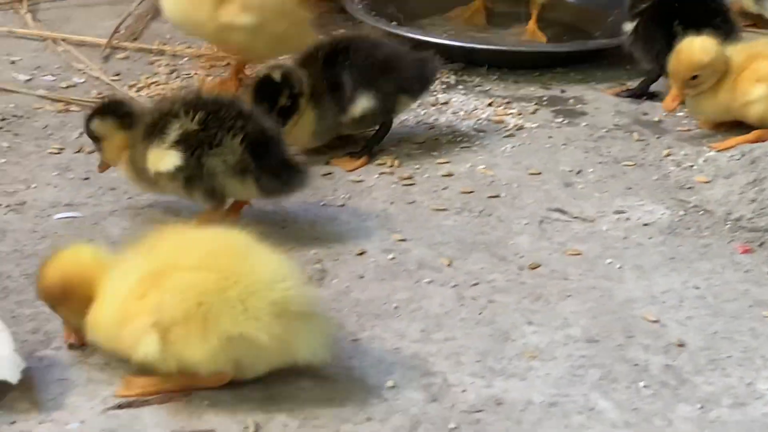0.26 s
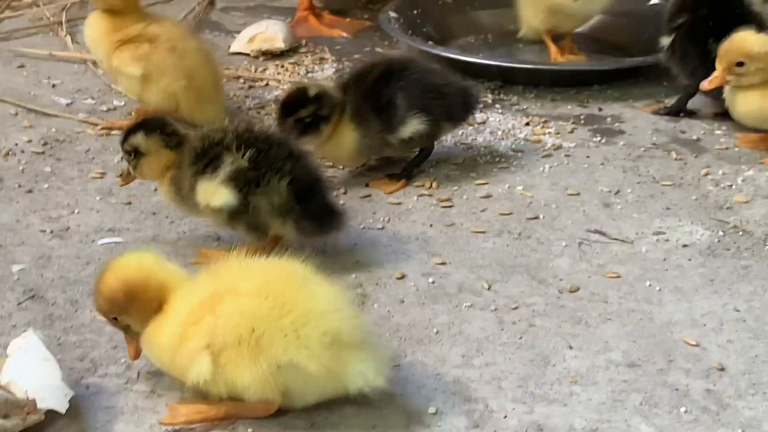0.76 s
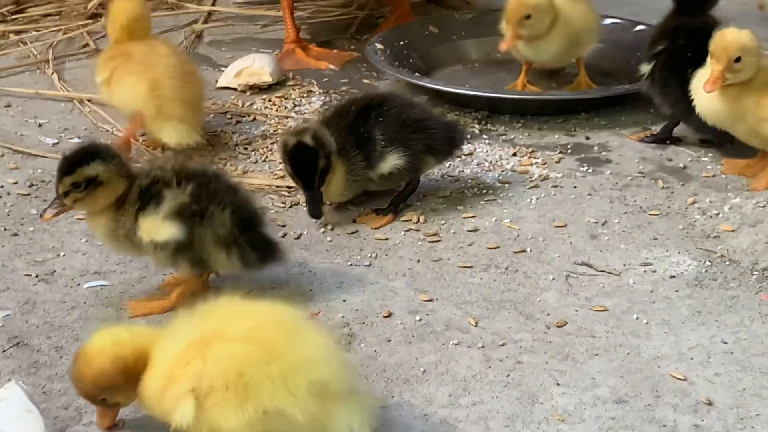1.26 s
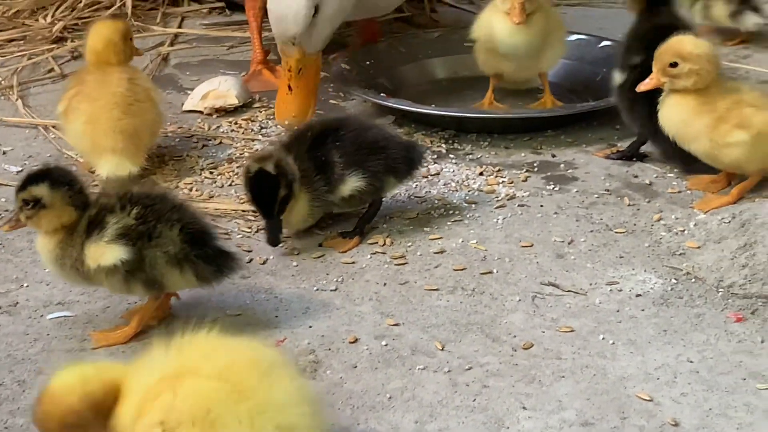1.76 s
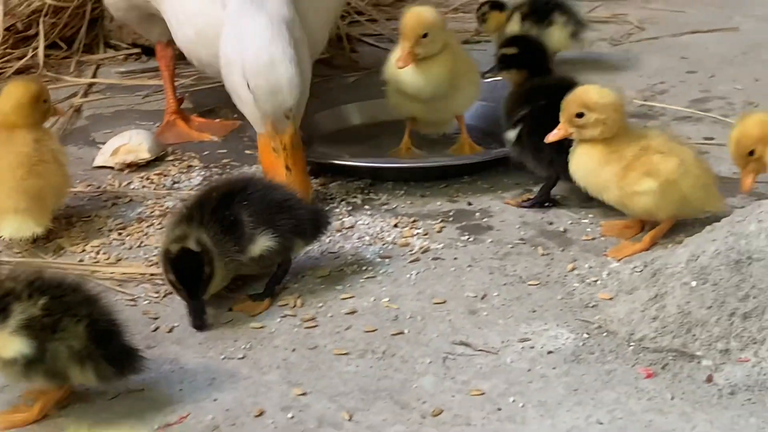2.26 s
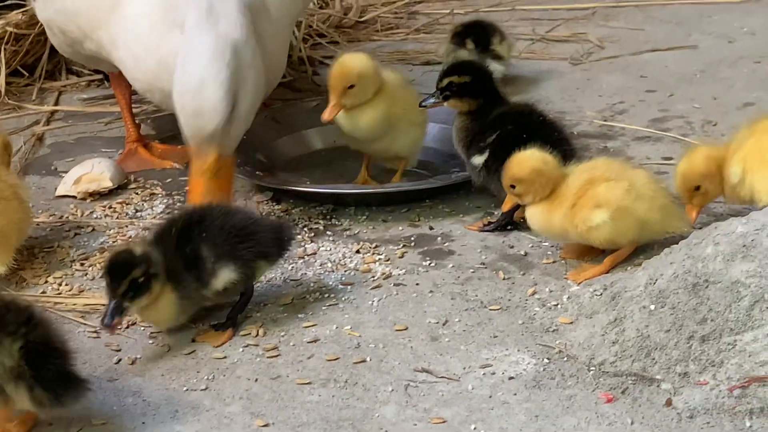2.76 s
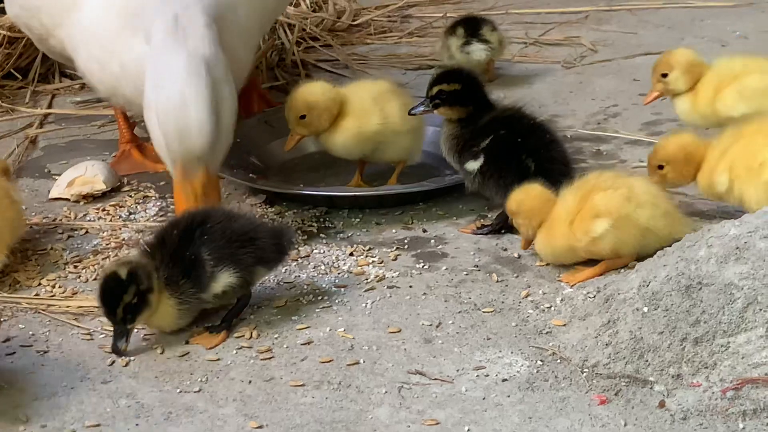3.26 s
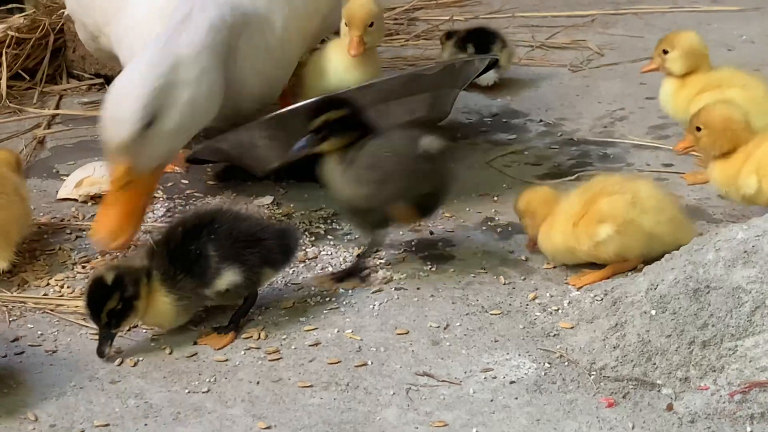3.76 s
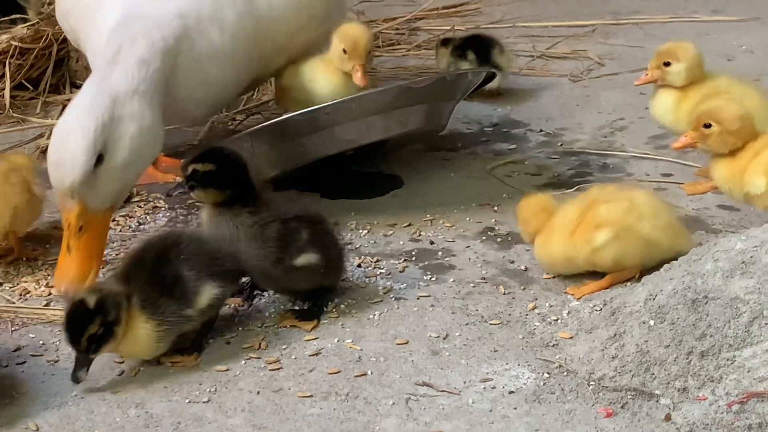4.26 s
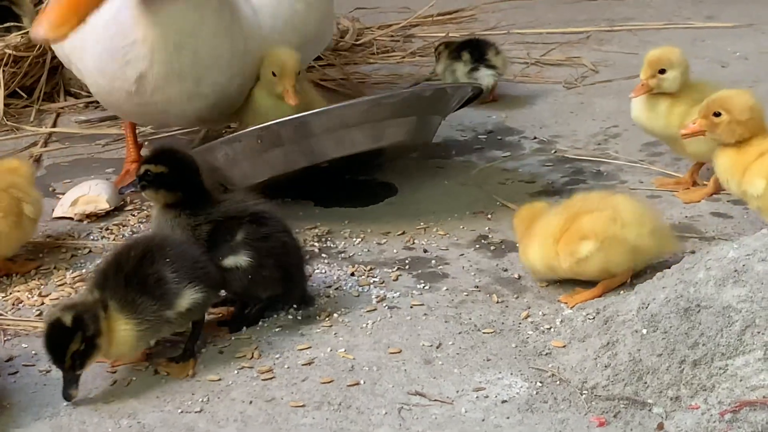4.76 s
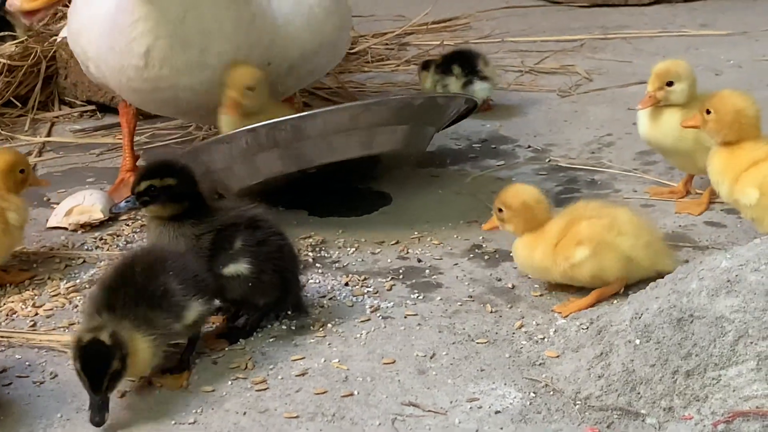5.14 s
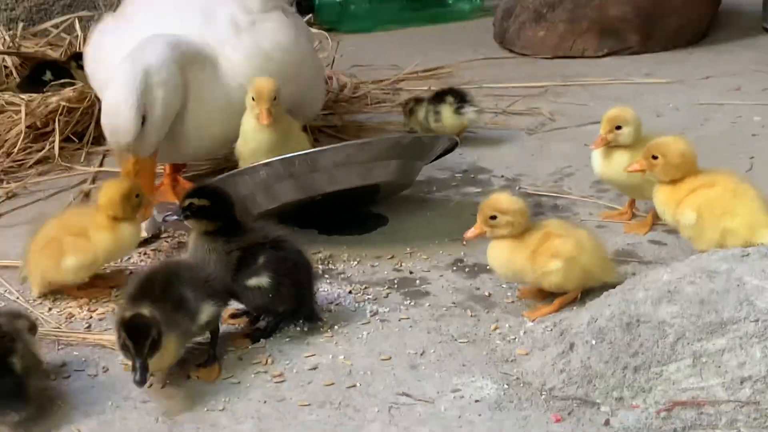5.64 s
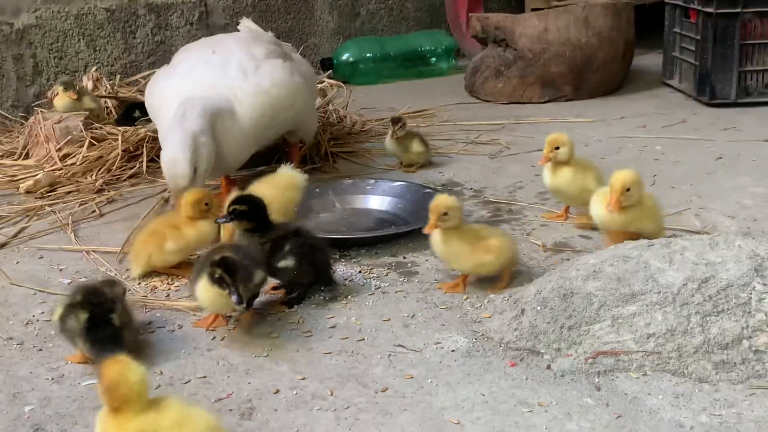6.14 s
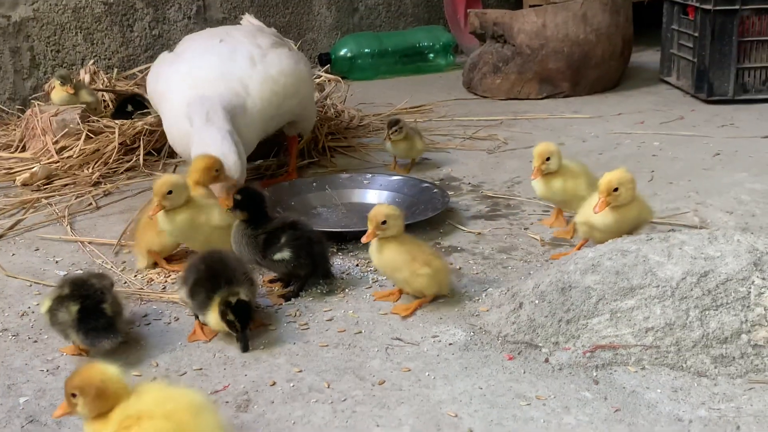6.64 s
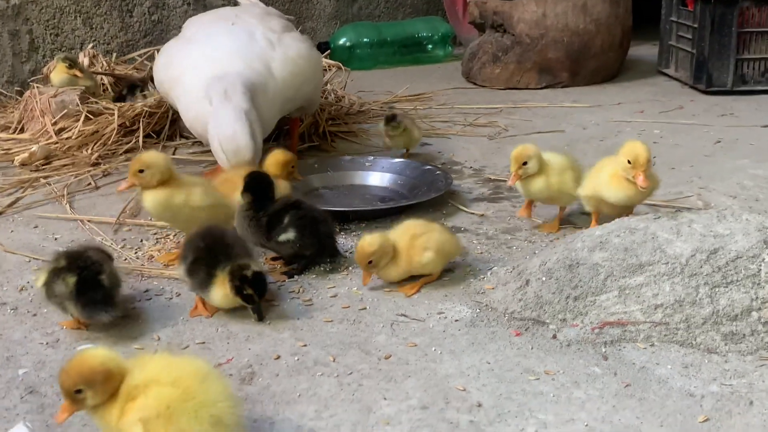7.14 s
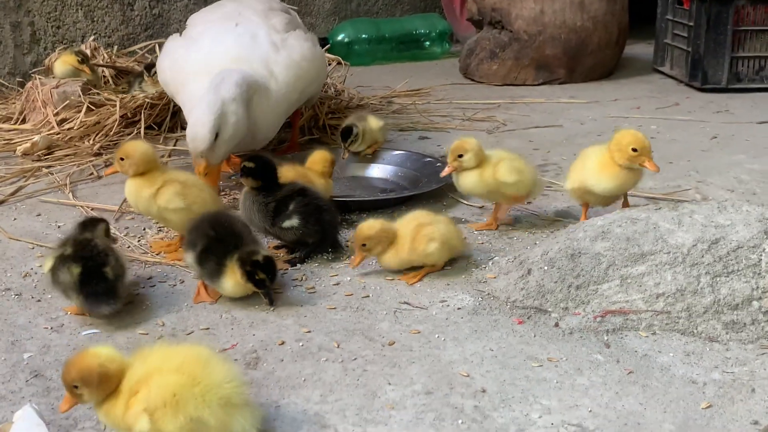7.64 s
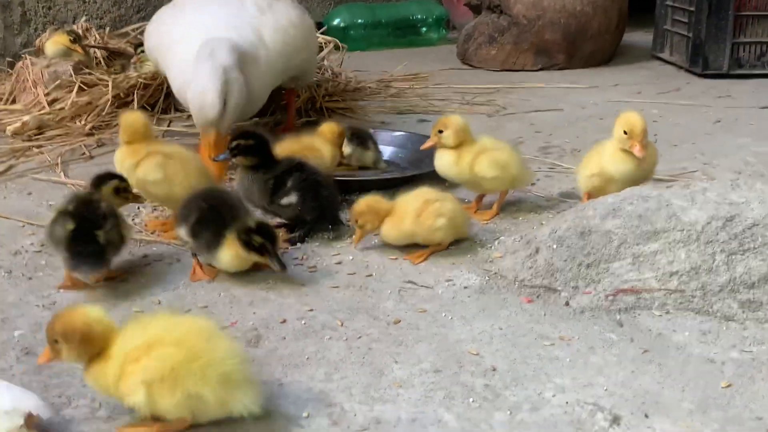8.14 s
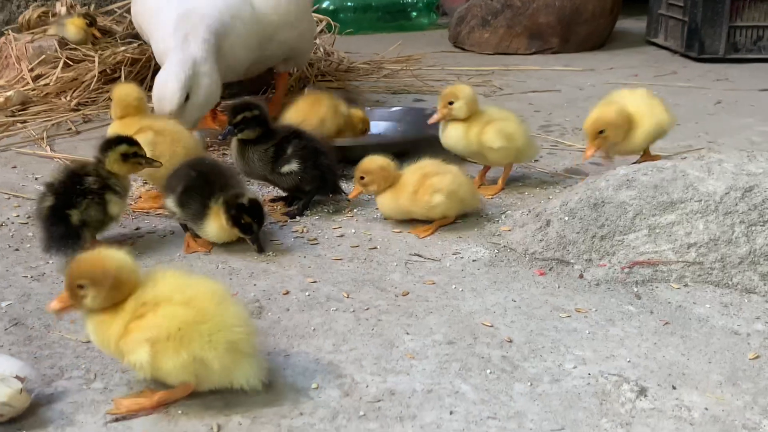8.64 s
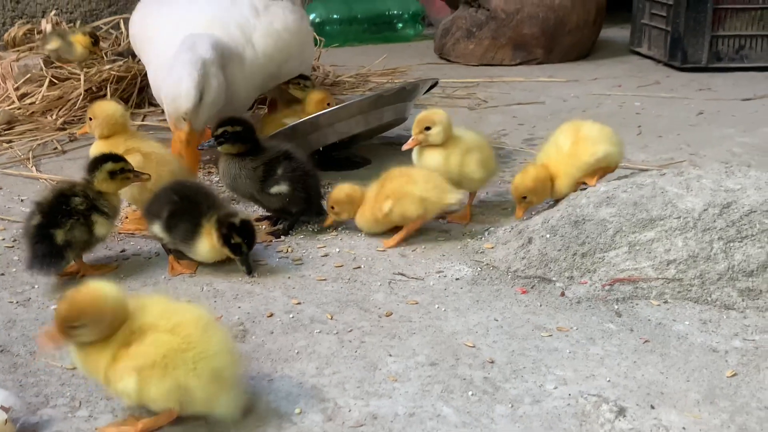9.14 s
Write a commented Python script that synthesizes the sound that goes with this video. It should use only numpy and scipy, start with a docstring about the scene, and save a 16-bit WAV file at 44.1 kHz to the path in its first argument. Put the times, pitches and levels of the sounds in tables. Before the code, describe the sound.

A brood of ducklings peeps continuously, close and outdoors on concrete beside a wall. A thin steel dish clatters at the very start, then an adult duck gives two short rough quacks in the first second. Lighter tinny knocks and scrapes return in the middle, a hard metallic bang comes just before six seconds, and weaker taps follow near the end. Straw and grain rustle softly over low distant traffic.

```python
"""Ducklings peep throughout around a duck on a concrete yard floor, with far traffic and close walls behind.
A thin steel dish clatters at the start as damped modes; the duck, left of two spaced microphone ports,
quacks at 0.5 and 1 s, as pitch pulses through throat resonances, and grunts at 3.6 s amid new clatter.
The hardest blows fall at 5.9 s, weaker ones after 7.8 s; filtered noise makes feet and bills shuffle
in straw and grain."""
import sys
import numpy as np
from scipy import signal
from scipy.fft import rfft, irfft, next_fast_len
from scipy.io import wavfile
from scipy.ndimage import uniform_filter1d, map_coordinates

SR = 44100
rng = np.random.default_rng(int(sys.argv[2]) if len(sys.argv) > 2 else 0)


def wav_out(sig):
    """Save sig, one row per channel (or a flat mono array), as 16-bit PCM at SR to the path in sys.argv[1]."""
    wavfile.write(sys.argv[1], SR, np.round(np.clip(np.atleast_2d(sig).T, -1, 1) * 32767).astype(np.int16))


N = 414540


def amp(db):
    """Decibels are logarithmic: 20 dB is a tenfold amplitude."""
    return 10 ** (np.asarray(db) / 20)


def unit(x):
    """Normalization: x scaled to an rms of 1."""
    return x / np.sqrt(np.mean(x ** 2) + 1e-20)


def along(points, hz):
    """Interpolates (Hz, value) points on a logarithmic frequency axis, as pitch is heard."""
    f, v = np.transpose(points)
    return np.interp(np.log(hz + 1), np.log(f + 1), v)


def curves(rows):
    """Piecewise linear envelopes: one value per sample for each column after the time."""
    s, *cols = np.transpose(rows)
    return [np.interp(np.arange(N) / SR, s, c, left=c[0], right=c[-1]) for c in cols]


def wobble(rate):
    """Slow random modulation: a smooth curve through `rate` random knots a second."""
    knots = rng.standard_normal(int(N * rate / SR) + 4)
    return map_coordinates(knots, [np.arange(N) * rate / SR])


def filtered(x, response):
    """Linear filtering: the spectrum of x times a complex response of frequency."""
    m = next_fast_len(N + SR // 4)
    return irfft(rfft(x, m) * response(np.fft.rfftfreq(m, 1 / SR)), m)[..., :N]


def ports(x, lead_s):
    """Interaural-style delay: the left port hears x lead_s earlier than the right one."""
    side = np.array([[1], [-1]])
    return filtered(x, lambda hz: np.exp(1j * np.pi * hz * lead_s * side))


def rush(mid, side, side_db, grains):
    """Stereo noise as a sum of alike and opposed parts, uneven in patches; grains sets the crackle."""
    crackle = rng.exponential(1, N // 64 + 1).repeat(64)[:N]
    source = rng.standard_normal((2, N)) * amp(grains * crackle)
    z = signal.stft(source, nperseg=512)[2]
    patches = uniform_filter1d(rng.standard_normal(z.shape[1:]), size=6, axis=0)
    patches = uniform_filter1d(patches, size=12, axis=1)
    source = signal.istft(z * amp(3 * unit(patches)), nperseg=512)[1][:, :N]
    m, s = filtered(source, lambda hz: amp([along(mid, hz), along(side, hz)]))
    m, s = unit(m), amp(side_db) * unit(s)
    return np.array([m + s, m - s])


def add(track, s, sound):
    """Superposition: mixes sound into track from s seconds."""
    part = track[..., max(round(s * SR), 0):][..., :sound.shape[-1]]
    part += sound[..., :part.shape[-1]]


def peep(length, start_hz, top_hz, end_hz, turn, hoarse):
    """Frequency modulation: a hoarse whistle follows a two-sided pitch arch, with a weak octave."""
    u = np.arange(round(length * SR)) / (length * SR)
    turn = np.clip(turn, .05, .95)
    rise = top_hz - (top_hz - start_hz) * (1 - u / turn) ** 2
    fall = top_hz - (top_hz - end_hz) * ((u - turn) / (1 - turn)) ** 2
    hz = np.where(u < turn, rise, fall)
    rasp = unit(uniform_filter1d(rng.standard_normal((2, len(u))), size=70))  # phase and level flutter
    phase = 2 * np.pi * np.cumsum(hz) / SR + hoarse * rasp[0]
    envelope = np.sin(np.pi * u) ** 0.49 * (1 + hoarse * rasp[1])
    return envelope * (np.sin(phase) + amp(-25.0) * np.sin(2 * phase))


def ducklings():
    """Direct and reverberant sound: near peeps one by one, and a random far chatter for the walls alone."""
    # near peeps: start_s, length_s, top_hz, arch_depth (share of the top), level_db (before spread and mix)
    near_peeps = [(0, .045, 3950, .02, -46), (.25, .055, 2900, .18, -48), (0.409, 0.054, 3500, 0.32, -41),
                  (0.698, .061, 3440, .07, -48.5), (.827, .065, 3880, .31, -46),
                  (0.873, .069, 4030, .3, -49), (1.203, .026, 3455, .3, -50.5),
                  (1.299, .05, 2910, .3, -51.5), (1.368, .052, 3110, .29, -56),
                  (1.456, .056, 3610, .3, -46), (1.533, .04, 3800, .2, -49.5), (1.612, .06, 3350, .28, -51),
                  (1.728, .055, 3620, .3, -48), (1.79, .049, 3780, .28, -45), (2.056, .066, 5640, .4, -48),
                  (2.154, .065, 4710, .45, -49.5), (2.379, .07, 3896, .27, -49),
                  (2.552, .045, 3780, .1, -50), (2.63, .075, 2200, .03, -51), (2.74, .05, 3260, .08, -52.5),
                  (2.787, .077, 3770, .29, -42), (2.833, .076, 2938, .13, -48), (2.83, .08, 4200, .23, -50),
                  (3.0, .05, 3120, .06, -51), (3.04, .065, 3950, .07, -49), (3.1, .06, 2150, .03, -54),
                  (3.198, .066, 3176, .08, -42.5), (3.26, .11, 3300, .05, -45.5),
                  (3.456, .034, 4020, .05, -44.5), (3.746, .05, 2850, .28, -45),
                  (3.79, .11, 2724, .31, -49), (4.004, .05, 3856, .04, -47.5),
                  (4.11, .049, 4570, .4, -39.5), (4.128, .042, 5380, .45, -44),
                  (4.161, .075, 3340, .26, -42), (4.265, .046, 3620, .36, -46),
                  (4.291, .048, 3370, .28, -43), (4.42, .067, 4027, .09, -50.5),
                  (4.429, 0.037, 4750, .04, -52), (4.734, .062, 4010, .22, -46),
                  (4.745, .043, 4610, .2, -51.5), (4.759, .057, 3470, .3, -45.5),
                  (4.845, .057, 4260, .36, -43.5), (4.873, .051, 3690, .05, -46),
                  (4.984, .053, 5310, .5, -44), (5.335, .06, 3400, .1, -50.5),
                  (5.461, .089, 3435, .25, -43), (5.472, .058, 3975, .32, -46.5),
                  (6.15, .05, 3550, .3, -49), (6.168, .045, 3900, .06, -45),
                  (6.285, 0.077, 3970, .3, -47.5), (6.296, 0.026, 4500, .05, -51.5),
                  (6.472, .071, 4190, .44, -50), (6.492, .056, 3650, .29, -43),
                  (6.645, .064, 3925, .28, -38), (6.682, .047, 3330, .32, -51.5),
                  (6.811, .079, 3920, .3, -42.5), (6.958, .052, 4620, .28, -43.5),
                  (7.026, .041, 3850, .28, -42.5), (7.15, .058, 4350, .42, -43),
                  (7.257, .081, 3140, .19, -47), (7.303, .062, 4500, .29, -43), (7.27, .12, 2200, .03, -57),
                  (7.352, .05, 3150, .2, -49), (7.388, .045, 3660, .2, -47.5), (7.432, .06, 3300, .22, -47),
                  (7.49, .03, 3250, .15, -51), (7.698, .066, 4424, .35, -45.5),
                  (7.786, .043, 3260, .15, -52), (7.872, .06, 5650, .4, -53.5), (8.003, .06, 3850, .1, -53),
                  (8.259, .053, 4045, .39, -43), (8.375, .054, 3290, .41, -48),
                  (8.398, .068, 4640, .29, -47), (8.54, .048, 3026, .27, -47.5),
                  (8.596, .061, 4216, .38, -43.5), (8.634, .051, 3570, .1, -44.5),
                  (8.646, .081, 3976, .34, -44), (8.985, 0.052, 3373, .03, -57),
                  (9.156, 0.052, 3840, .1, -56), (9.32, .04, 3280, .28, -51)]
    # murmurs, lopsided peeps and gliding squeaks, plus the low calls (650-1200 Hz) of another bird: # start_s,
    # length_s, start_hz, top_hz, end_hz, turn (share before the top), level_db (before spread and mix)
    murmurs = [(1.008, .03, 3400, 4800, 4750, .8, -47), (1.908, .045, 2700, 3700, 3650, .4, -44),
               (2.605, .07, 3500, 3950, 2800, .22, -45), (5.395, .045, 3500, 4900, 4750, .65, -48),
               (5.565, .035, 2800, 3250, 3100, .3, -43), (5.648, .055, 2800, 4150, 4000, .45, -42),
               (.64, .31, 646, 717.6, 660, .4, -59.5), (1.63, .03, 750, 950, 900, .87, -46),
               (3.996, .19, 644, 677, 660, .28, -60.5), (5.529, .04, 1220, 1210, 708, .1, -47),
               (3.376, .065, 3600, 3600, 2250, .05, -43), (4.455, .06, 900, 2550, 2500, .9, -51),
               (4.505, .08, 2480, 2700, 2680, .9, -51), (4.585, .09, 2200, 2200, 1550, .05, -48),
               (5.792, .066, 1270, 2260, 2105, .63, -54), (7.509, 0.055, 1420, 1457, 1390, .48, -57)]
    # pushed ducklings turn hoarse: start_s, length_s, flutter_rad
    jostle = [(.56, .36, .65), (2.75, .2, .35), (3.35, .55, .35), (3.99, .01, .5), (4.18, .2, .4),
              (6.14, .6, .25), (8.58, .24, .9)]
    # ducklings further off: time_s, level_db
    crowd = [(0, -60), (.7, -55), (1, -62), (2.5, -67.5), (2.82, -53.5), (3.05, -58.5), (3.3, -48.5),
             (3.8, -54), (4.1, -66), (5, -75.5), (6.2, -67), (7.45, -58), (8.2, -66), (8.55, -77),
             (8.66, -53), (8.9, -78.5), (9.4, -67.5)]
    turn, fall_over_rise = .39, 1.1  # share of a near peep before its top; its fall against its rise
    clear_rad = .14  # phase flutter of a calm voice
    near, far = np.zeros((2, N)), np.zeros(N)
    arches = [(s, length, hz * (1 - depth), hz, hz * (1 - fall_over_rise * depth), turn, db)
              for s, length, hz, depth, db in near_peeps]
    for s, *shape, db in arches + murmurs:
        pushed = [rad for start, length, rad in jostle if start < s < start + length]
        hoarse = max([clear_rad] + pushed)
        port_db = db + rng.normal(0, 2.4) * np.array([[1], [-1]])  # random place left or right
        add(near, s, amp(port_db) * peep(*shape, hoarse))
    for s, a, b, c, d in rng.random((900, 5)):
        top_hz = 2500 + 2100 * a
        length, far_turn = 0.034 + 0.03766 * b, 0.3116 + 0.291 * c
        call = peep(length, 0.64 * top_hz, top_hz, .78 * top_hz, far_turn, hoarse=0.51)
        add(far, s * N / SR, amp(4 * d) * call)
    return near, amp(curves(crowd)[0]) * unit(far)


def throat(f, share):
    """Formants: signed resonances in parallel, the deep ones moved by share, under a bill low-pass."""
    # resonances: centre_hz (times share below 2000 Hz), width_hz, level_db, sign
    resonances = [(170, 80, 0, 1), (325, 110, 3, -1), (594, 310, -5, 1), (1300, 367, 1, 1),
                  (1720, 360, 9, -1), (2200, 300, 3, 1), (3450, 250, -11, 1), (4200, 260, -9.5, -1),
                  (5270, 130, -22.5, 1), (6500, 500, -12.5, -1)]
    bill_top_hz = 7700
    total = 0
    for c, w, db, sign in resonances:
        centre = c * share if c < 2000 else c
        total = total + sign * amp(db) * 1j * f * w / (centre ** 2 - f * f + 1j * f * w)
    return total / (1 + (f / bill_top_hz) ** 16)


def duck():
    """Source and filter: pitch pulses with breath in every cycle pass the throat; hiss passes the bill."""
    # quacks and grunt: start_s, length_s, first_pitch_hz, last_pitch_hz, level_db (before swell and mix),
    # sag_db_per_s, throat_share (deep throat pitch), jitter_share
    calls = [(.462, .09, 136.1, 168.9, -16, 1, 1, .01), (.997, .061, 270, 150, -20.5, 100, .85, .04),
             (3.566, 0.083, 152.7, 159, -38, 67, .95, .012)]
    # breath through the bill: frequency_hz, relative_db_per_hz
    bill = [(1700, -31), (2500, 2), (3700, 3), (5300, -5), (6600, 2), (7600, -7), (8400, -40)]
    swell_s, swell_db = 0.033, 25  # a call swells by swell_db over swell_s, while sagging by sag_db_per_s
    cut_s, hiss_tail_s = .022, 0.017  # after the call's length: time of a 45 dB voice fall, of a 9 dB hiss fall
    glide_s, hiss_db = .032, -17  # time constant of the settling pitch; hiss against the voice
    out = np.zeros(N)
    for s, length, first_hz, last_hz, top_db, sag_db, share, jitter in calls:
        t = np.arange(N) / SR - s
        hz = last_hz + (first_hz - last_hz) * np.exp(-t.clip(0) / glide_s)
        held_db = top_db - sag_db * t
        to_swell = (1 - t / swell_s).clip(0)
        voice_db = held_db - swell_db * to_swell.clip(0, 1) ** 2 - 45 * ((t - length) / cut_s).clip(0)
        breath_db = held_db + hiss_db - 30 * to_swell - 9 * ((t - length) / hiss_tail_s).clip(0)

        cycles = np.cumsum(hz * (1 + jitter * wobble(90))) / SR
        cycles -= cycles[round(s * SR)]  # the first pulse comes right at the start
        pulses = (np.diff(np.floor(cycles), prepend=0) > 0) * amp(2.2 * wobble(170))
        breath = .035 * np.exp(-4.5 * (cycles % 1)) * rng.standard_normal(N)
        voice = unit(filtered(pulses + breath, lambda f: throat(f, share)))
        hiss = unit(filtered(rng.standard_normal(N), lambda f: amp(along(bill, f))))
        hiss = hiss * 2 * np.exp(-2 * (cycles % 1))  # strongest as each cycle opens
        out += (t > 0) * (amp(voice_db) * voice + amp(breath_db) * hiss)
    return out


def dish_modes():
    """Modal theory: a sheet rings in strong modes over 70 weak random ones; returns columns."""
    # strong modes: frequency_hz, level_db (before each blow's lean), t60_s (ringing wholly free)
    strong = [(149, -23, 0.069), (324.4, -8, 0.23), (535, -6, .6), (651, -15.5, 0.49), (915, -4, 0.26),
              (1069.5, -1, 0.2), (1150, -3, 0.23), (1227, -16.5, 0.13), (1393, -2, 0.17), (1490, -2, .3),
              (1700, 2, .16), (1790, -10, .1), (2160, -2, 0.2), (2676, 4, 0.1), (3245, -2, 0.11),
              (3304, 1.5, 0.11), (3810, -5.5, .4), (3670, -7.5, 0.31), (3960, -6, .3), (4600, -10, 0.16),
              (5600, -30, .3), (6650, -22, 0.06)]
    weak = np.transpose([450 * 14 ** rng.random(70), np.full(70, -12.), np.full(70, .2)])
    hz, level, t60 = np.transpose(np.vstack([strong, weak]))[:, :, None]
    faint = np.arange(len(hz))[:, None] >= len(strong)
    level -= faint * 5 * np.log2(hz / 1000).clip(0)
    return hz, level, t60, faint


def dish_blows(hz, level, t60):
    """Impact excitation: a crack and gritty scuff set modes near the favoured pitch ringing loudest."""
    # blows: start_s, peak_db (before the mix), favoured_hz, freedom_to_ring (0-1, scales t60)
    blows = [(.045, -28, 1100, .6), (.052, -34, 2650, .3), (.054, -37, 3950, .15), (.113, -35, 1700, .5),
             (.142, -38, 3950, .15), (.148, -31, 1400, .4), (.195, -35, 2000, .2), (1.171, -41.5, 1690, .4),
             (1.595, -45, 700, .08), (3.427, -33, 1000, .1), (3.49, -41, 2680, .6), (3.468, -34, 830, 0.1),
             (3.512, -37, 1710, 0.7), (3.571, -34, 3000, .1), (3.573, -33, 1680, .15),
             (3.578, -37, 800, .3), (3.618, -33, 2900, .3), (3.619, -32, 1400, .4), (3.63, -34, 420, .3),
             (3.719, -36, 1620, .2), (3.878, -43, 1030, .9), (3.879, -44, 1370, .9), (3.997, -42, 1030, .6),
             (3.999, -44, 1750, .9), (4.191, -44, 307, 0.12), (4.239, -38, 1030, .2),
             (4.241, -41, 1680, .45), (4.243, -44, 1390, .9), (4.327, -38, 1070, 0.7),
             (4.33, -44, 1690, .5), (4.463, -42, 600, .15), (4.443, -35, 1120, .25), (4.474, -37, 1100, .3),
             (4.574, -39, 330, .1), (4.575, -35, 1140, .6), (4.613, -33, 600, .1), (4.632, -33, 480, .1),
             (4.65, -38, 1200, .3), (4.727, -38, 380, .1), (4.73, -43, 650, .55), (4.825, -42, 450, .2),
             (4.84, -47, 1850, .6), (4.86, -48, 1690, .8), (5.088, -46, 1050, 0.65),
             (5.511, -44.5, 315, .15), (5.667, -43, 325, .15), (5.727, -47, 334, .1),
             (5.798, -42, 450, .12), (5.835, -42, 1150, .3), (5.86, -21, 1200, .5), (5.866, -25, 2170, .55),
             (5.884, -26, 540, .6), (5.915, -28, 1150, .7), (5.975, -32, 540, .55), (6.012, -34, 2150, .25),
             (5.868, -20.5, 3900, .35), (5.9, -26, 2700, .4), (5.878, -15.5, 1780, .6),
             (5.929, -24, 1720, .7), (6.02, -33, 540, .4), (6.065, -35, 1490, .9), (7.837, -30.5, 1510, .3),
             (8.172, -46, 1500, .7), (8.595, -47, 1500, .5), (8.633, -44, 1340, .43),
             (8.72, -43, 1700, 0.9), (8.742, -38, 915, .2), (8.817, -39, 334, 0.12),
             (8.83, -40.5, 1647, 0.79), (8.9, -45, 915, .3), (8.992, -41, 915, .3), (9.05, -45, 915, .5)]
    scuff_s, scuff_s_per_db = .017, .0009  # scuff decay at -35 dB; harder blows skid longer
    soft_db = 11.5  # most that a weak contact loses per octave, beyond .45 octave from its pitch
    out, t = np.zeros(N), np.arange(SR // 3) / SR
    rings = np.sin(2 * np.pi * hz * t)
    for s, db, favour_hz, free in blows:
        scuff = scuff_s + scuff_s_per_db * (db + 35)
        lean = 18 * np.exp(-(np.log(hz / favour_hz) / .095) ** 2) + rng.normal(0, 3, hz.shape)
        softness = np.clip((-20 - db) / 15, 0, 1)
        lean -= soft_db * softness * (np.abs(np.log2(hz / favour_hz)) - .45).clip(0)
        decay_db = -60 * t / (t60 * np.clip(free, .05, 1))
        ring = np.sum(amp(level + lean + decay_db) * rings, 0)
        push = rng.standard_normal(SR // 8) ** 3 * np.exp(-t[:SR // 8] / max(scuff, .001))  # gritty contact
        push[0] = 32  # the crack
        hit = signal.fftconvolve(ring, push)
        add(out, s, amp(db) * hit / np.max(np.abs(hit)))
    return out


def dish_rasps(hz, level, t60, faint):
    """Friction excitation: a rim chattering over concrete stirs all modes without a break."""
    # rasps: start_s, length_s, first_db, last_db (before the mix), top_hz
    rasps = [(.045, .19, -37, -47, 3000), (3.41, .1, -53, -53, 2500), (3.575, .16, -46, -53, 1500),
             (4.61, .07, -48, -51, 1500), (4.725, .21, -54, -58, 900), (5.9, .16, -40, -46, 3000),
             (8.64, .29, -50, -50, 1800), (8.95, .15, -52, -55, 1500)]
    turn_s, free = .025, .35  # time until the touching point moves on; freedom to ring
    vary_db, weak_db = 4, -8  # each point stirs the modes differently, the weak ones less
    out, t = np.zeros(N), np.arange(SR // 8) / SR
    decaying = amp(-60 * t / (t60 * free)) * np.sin(2 * np.pi * hz * t)
    for start, length, first_db, last_db, top_hz in rasps:
        for s in np.arange(start, start + length, turn_s):
            stir = amp(level + weak_db * faint + vary_db * rng.standard_normal(hz.shape))
            stir = stir / (hz / 700) ** .5 / (1 + (hz / top_hz) ** 4)
            ring = np.sum(stir * decaying, 0)
            grit = unit(rng.standard_normal(SR // 20) ** 3) * (t[:SR // 20] < turn_s)
            db = first_db + (last_db - first_db) * (s - start) / length
            add(out, s, amp(db) * signal.fftconvolve(ring / np.linalg.norm(ring), grit))
    return out


def dish_thumps():
    """Damped low oscillation: the empty dish lands flat with a thump of falling pitch."""
    # landings: start_s, level_db (before onset, decay and mix)
    landings = [(.018, -21), (3.42, -39), (3.578, -39), (3.625, -37.5), (4.613, -40), (8.65, -42),
                (8.745, -39), (8.825, -38), (8.995, -41), (9.031, -43)]
    out, t = np.zeros(N), np.arange(SR // 20) / SR
    thump = np.sin(2 * np.pi * (90 * t + 1.9 * (1 - np.exp(-t / 0.005))))  # settles at 90 Hz
    thump *= (1 - np.exp(-t / 0.0027)) * np.exp(-t / 0.015)
    for s, db in landings:
        add(out, s, amp(db) * thump)
    return out


def dish():
    """Superposition: blows and rasps excite the same modes of the sheet, thumps lie below."""
    hz, level, t60, faint = dish_modes()
    return dish_blows(hz, level, t60) + dish_rasps(hz, level, t60, faint) + dish_thumps()


def straw():
    """Granular noise: crackling rustle and single snaps, feet on grain and the dragging dish."""
    # bustle on the floor: time_s, drag_db (dish dragging, bodies brushing), feet_db (on grain), rustle_db;
    # levels before the random wobble and the opposed part
    bustle = [(.05, -52, -61, -64), (.2, -51, -72, -72), (.32, -69.5, -78, -70.5), (.95, -63, -70, -83),
              (1.08, -54.5, -81, -81), (1.18, -61, -77, -67.5), (1.36, -68.5, -68, -74.5),
              (2.56, -72.5, -80, -79.5), (3.3, -72, -64, -66), (3.56, -62, -72, -66), (3.62, -52, -69, -66),
              (3.76, -64, -69, -67), (3.98, -70.5, -68, -68.5), (4.56, -66, -80, -67),
              (4.64, -59, -86, -65.5), (4.95, -69, -82, -68), (5.6, -73, -78, -70), (5.85, -62, -79, -64),
              (5.92, -45, -79.5, -57.5), (6.15, -66.5, -74, -72.5), (6.44, -75.5, -77.5, -74.5),
              (7.4, -73, -78, -73.5), (7.6, -69, -62, -76), (7.8, -71.5, -78, -75), (8.45, -72, -76.5, -69),
              (8.66, -67, -73, -56.5), (8.85, -64, -80, -65), (9.2, -77.5, -81, -71.5)]
    # straw and grain snap: start_s, crisp_top_db, duller_body_db (before the decay)
    snaps = [(.0418, -38, -39), (.1376, -39.5, -42.5), (.183, -46, -53), (.2598, -54.5, -80),
             (.3242, -52.5, -80), (1.1717, -44.5, -48), (3.1812, -53, -60), (3.3762, -38, -47),
             (3.4565, -59, -48), (3.5713, -45, -45.5), (3.6187, -48.5, -61), (3.7199, -51, -52.5),
             (4.2343, -53, -71), (4.2487, -50.5, -80), (4.4613, -53, -69), (5.3433, -51, -49),
             (5.8596, -34, -33), (5.9294, -52.5, -65), (5.9564, -47, -41), (6.0152, -54, -42.5),
             (6.1654, -58, -53.5), (7.5087, -68, -49), (7.5667, -70, -43.5), (8.5634, -55, -77),
             (8.7146, -51, -62.5)]
    # straw, alike at both ports: frequency_hz, relative_db_per_hz
    straw_mid = [(3530, -31), (6000, -1.5), (7060, -5), (9120, -9.5), (11900, 4.5), (13300, -17),
                 (13900, -9.5), (14600, 8.5), (15200, -26), (16300, -36.5)]
    # straw, opposed at the ports: frequency_hz, relative_db_per_hz
    straw_side = [(3530, -39), (6000, -18), (8780, -1), (9960, -8.5), (11100, -28), (12000, -4.5),
                  (14300, 3.5), (15100, -4.5), (16300, -49)]
    # dry hiss of grain: frequency_hz, relative_db_per_hz
    grit = [(3500, -41), (5000, 6), (7500, -3), (8500, -65.5)]
    # dish dragging and bodies brushing: frequency_hz, relative_db_per_hz
    drag_tone = [(47, -40), (80, -51), (135, 2), (240, -14.5), (529, -7), (734, 0), (907, -7.5), (1160, -3),
                 (1680, -6.5), (8000, -21), (10400, -73.5), (17600, -120)]
    body_tone = [(1200, -40), (2000, 12.5), (6500, 2.5), (8000, -11)]
    drag_db, feet_db, rustle_db = curves(bustle)
    snap_gain, body_gain, t = np.zeros(N), np.zeros(N), np.arange(SR // 10) / SR
    decay = np.exp(-t / 0.0039) + 0.5 * np.exp(-t / 0.031)
    for s, db, body_db in snaps:
        add(snap_gain, s, amp(db) * decay)
        add(body_gain, s, amp(body_db) * decay)
    rustle_gain = amp(rustle_db + 2.5 * wobble(10)) + snap_gain
    rustle = rustle_gain * rush(straw_mid, straw_side, side_db=2, grains=2.75)
    feet = amp(feet_db + 6.1 * wobble(13)) * rush(grit, grit, side_db=1.0, grains=2.2)
    drag_gain = amp(drag_db + 2.4 * wobble(20) + 5.1 * wobble(5))
    drag = drag_gain * rush(drag_tone, drag_tone, side_db=-0.5, grains=1.4)
    body = body_gain * rush(body_tone, body_tone, side_db=-0.5, grains=0.52)
    return rustle + feet + drag + body


def walls(x):
    """Reverberation: floor and near wall answer at once, then the yard dies away exponentially."""
    # late decay: frequency_hz, t60_s
    yard_t60 = [(200, 0.25), (1500, 0.28), (4000, 0.23), (10000, 0.067)]
    out, step = np.zeros((2, N)), round(.3 * SR)  # a new random tail every .3 s, as the sources move
    for k in range(0, N, step):
        hz, t, z = signal.stft(rng.standard_normal((2, SR // 2)), SR, nperseg=256)
        alike = 1 / (1 + (hz[:, None] / 450) ** 2)  # long waves reach both ports alike
        z[1] = alike * z[0] + np.sqrt(1 - alike ** 2) * z[1]
        late = amp(-60 * t / along(yard_t60, hz)[:, None])
        early = 1.28 * np.exp(-t / 0.012)
        tail = signal.istft(z * (late + early), SR, nperseg=256)[1]
        echo = signal.fftconvolve(x[None, k:k + step], tail / np.linalg.norm(tail[0]), axes=1)
        add(out, k / SR + .002, echo)
    return out


def traffic():
    """Modulated tone and filtered noise: a wavering low hum and rumble far off, and the yard air."""
    # far traffic: time_s, hum_hz, hum_db, rumble_db (before the random wobble)
    far_traffic = [(0.0, 55.96, -56, -54), (0.34, 48.12, -55.5, -62), (4.27, 55.55, -61.5, -59),
                   (4.63, 43.7, -57, -57), (7.2, 48, -62.5, -58), (7.6, 49.1, -60.5, -52.5),
                   (8.3, 50, -62, -57.5), (9.4, 52.9, -56.5, -57)]
    # rumble and yard air, alike at both ports: frequency_hz, relative_db_per_hz
    air_mid = [(18, -30.5), (30, -13), (71, 4), (234, -8), (368, -15), (1820, -37.5), (3720, -39),
               (5200, -41.5), (7990, -45), (9000, -89), (11700, -93), (19800, -120)]
    # rumble and yard air, opposed at the ports: frequency_hz, relative_db_per_hz
    air_side = [(18, -32), (30, 5), (73, 5), (350, -7), (1160, -18), (3230, -19), (6600, -24), (9000, -45),
                (11700, -41), (19800, -120)]
    hum_hz, hum_db, rumble_db = curves(far_traffic)
    phase = 2 * np.pi * np.cumsum(hum_hz * (1 + 0.032 * wobble(1.8))) / SR
    hum = amp(hum_db + 0.99 * wobble(7.6)) * np.sin(phase)
    rumble_gain = amp(rumble_db + 1.2 * wobble(4))
    return hum + rumble_gain * rush(air_mid, air_side, side_db=-9.5, grains=0.24)


def scene():
    """Superposition of direct sounds, their echoes and the background; far peeps come only as echoes."""
    near, far = ducklings()
    quacks, clatter = duck(), dish()
    direct_duck = 0.73 * ports(quacks, 0.00041) + 0.26 * quacks
    direct = amp(-4.5) * ports(near, 7e-5) + direct_duck + ports(clatter, 7e-5)
    echoes = walls(amp(-1.5) * near.mean(0) + far + amp(-8) * quacks + amp(-5) * clatter)
    return direct + echoes + straw() + traffic()


def record(dry):
    """Band limiting: a steep high-pass at about 37 Hz, and nothing from top_hz upward."""
    top_hz = 16400
    return filtered(dry, lambda hz: (hz < top_hz) / np.sqrt(1 + (37 / (hz + 1)) ** 12))


dry = scene()
out = record(dry)
wav_out(out)
```